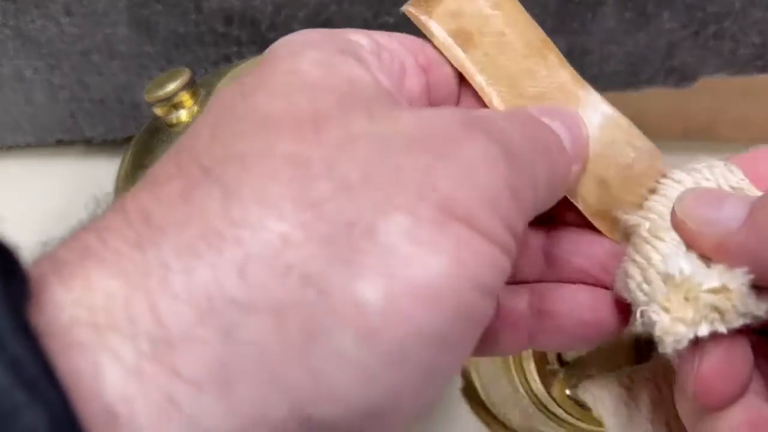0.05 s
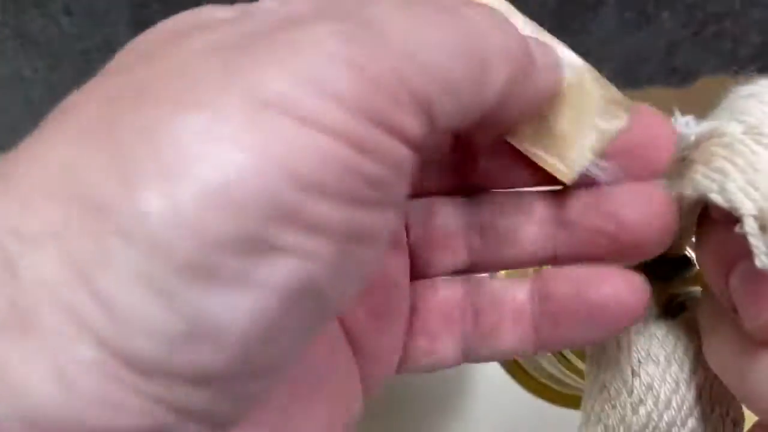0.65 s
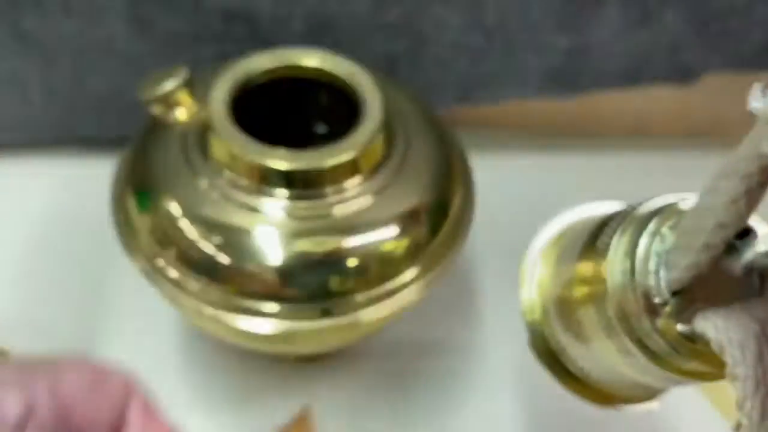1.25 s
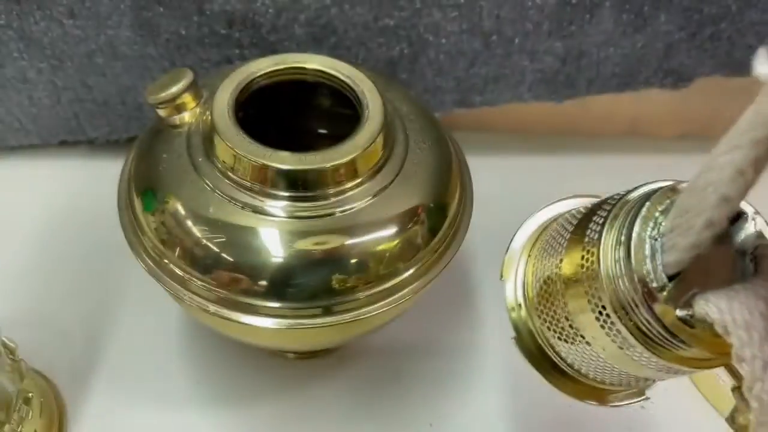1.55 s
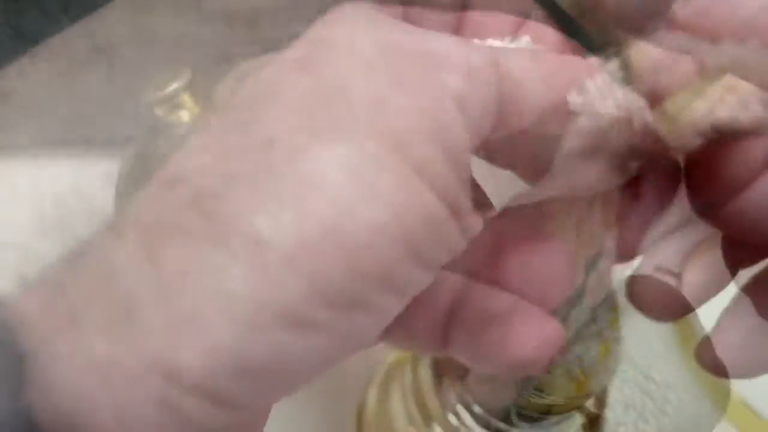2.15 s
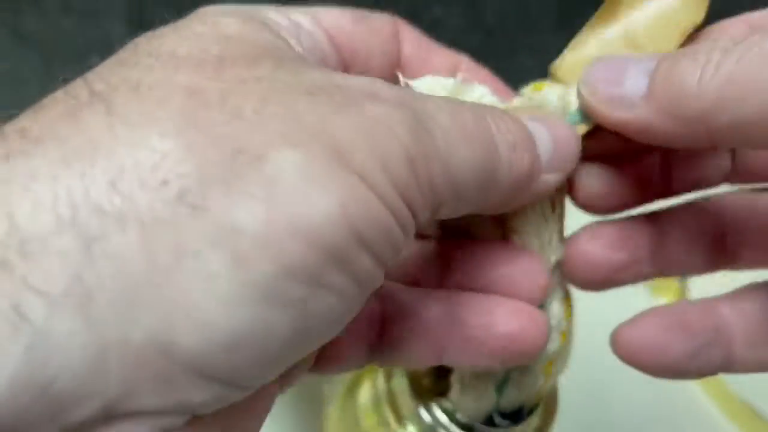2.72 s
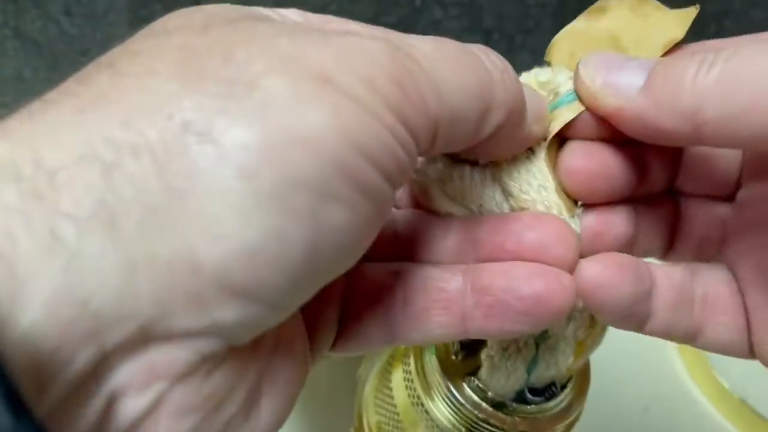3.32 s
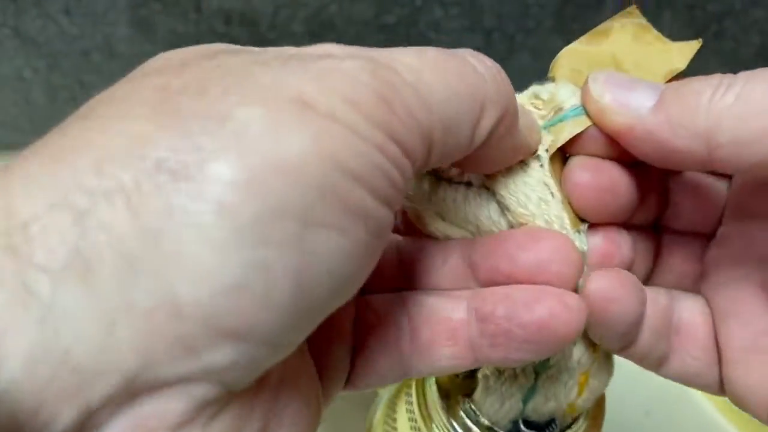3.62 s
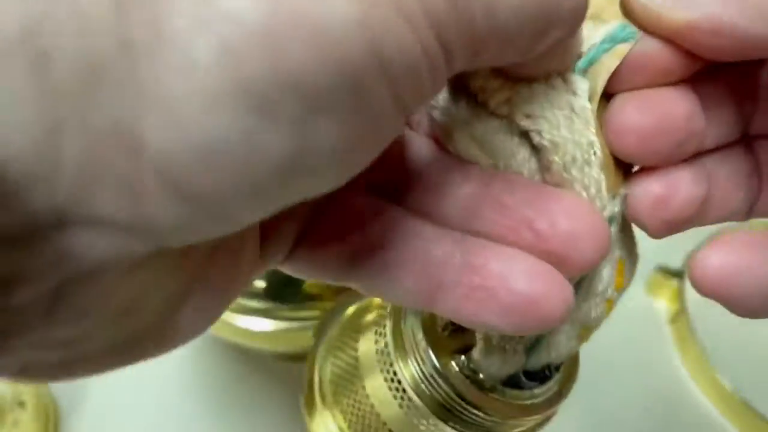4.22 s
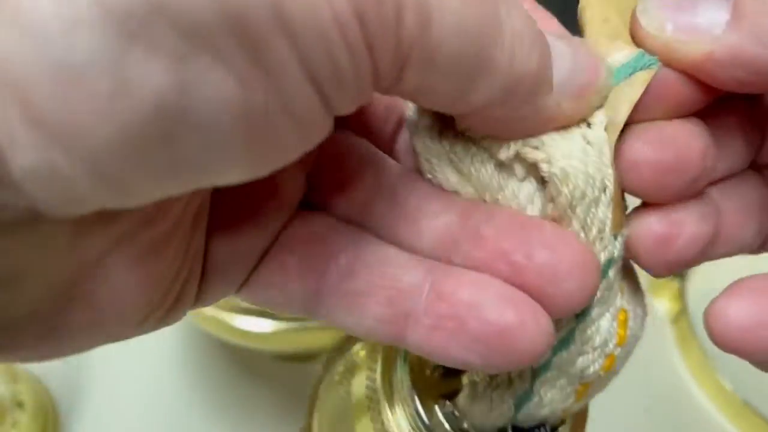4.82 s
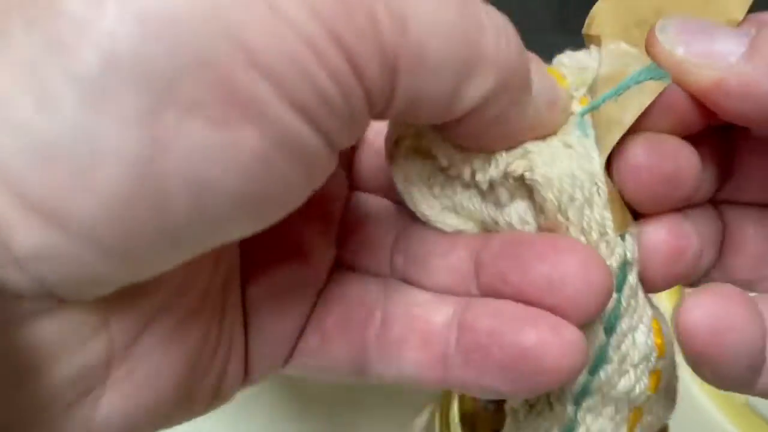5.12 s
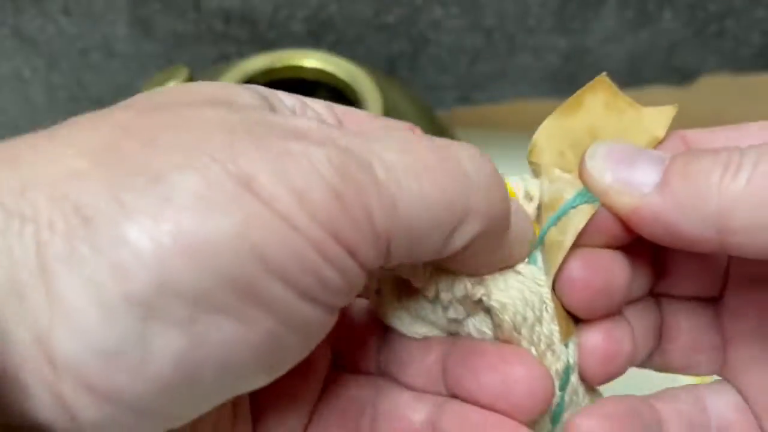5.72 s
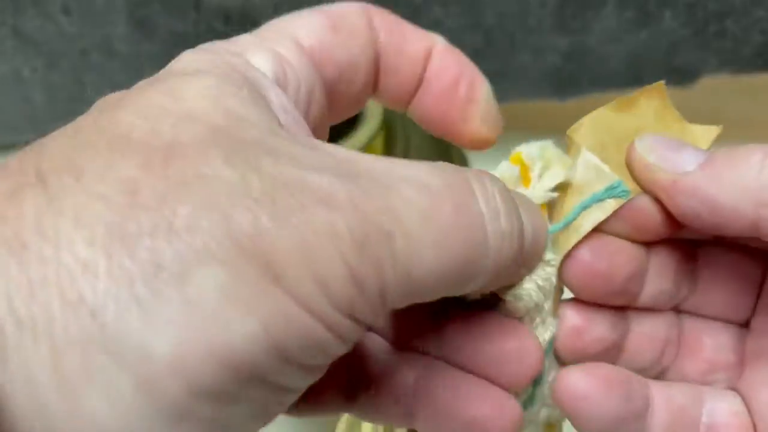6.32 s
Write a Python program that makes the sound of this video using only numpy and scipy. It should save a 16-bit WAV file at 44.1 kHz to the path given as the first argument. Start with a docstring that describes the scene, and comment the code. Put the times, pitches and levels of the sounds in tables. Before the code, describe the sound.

Close, quiet rustling and tiny snaps as fingers pull sticky paper from a cotton wick, with a single small metallic chatter.

```python
"""A quiet room, close up: two hands peel paper tape off a cotton lamp wick.
Glue and fibres let go in clumps of tiny slips and single snaps; fingers rub and bump the paper,
and the weave creaks. The hollow between the hands colours all of this. The brass burner hanging
on the wick chatters once as it swings. Underneath: arm rumble, sleeves, room air and faint hums."""
import sys
import numpy as np
from scipy import signal
from scipy.fft import rfft, irfft, next_fast_len
from scipy.io import wavfile
from scipy.ndimage import uniform_filter1d, map_coordinates

SR = 44100
rng = np.random.default_rng(int(sys.argv[2]) if len(sys.argv) > 2 else 0)


def generate_wav(sig):
    """Save sig (samples, or channels by samples) to the path in sys.argv[1] as 16-bit PCM at SR."""
    pcm = np.round(np.clip(np.atleast_2d(sig).T, -1, 1) * 32767).astype(np.int16)
    wavfile.write(sys.argv[1], SR, pcm)


N = 280557

# spectrum of parting glue and fibres: (frequency [Hz], density [dB])
FIBRE_SPECTRUM = [(4000, -42), (7000, -37), (8500, -4), (9700, 3), (11300, 7), (12300, -7), (13600, -21),
                  (15200, -21.5), (16200, -38.5)]
# spectrum of breaking threads: (frequency [Hz], density [dB])
THREAD_SPECTRUM = [(2500, -31.5), (4500, -1.5), (6200, 5), (7800, 9.5), (9500, 10.5), (13000, -48.5)]


def amp(db):
    """Decibels to gain."""
    return 10 ** (np.asarray(db) / 20)


def unit(x):
    """Scale to rms 1."""
    return x / np.sqrt(np.mean(x ** 2) + 1e-20)


def along(points, hz):
    """Interpolate (frequency [Hz], value) points on a log axis."""
    knots_hz, values = np.transpose(points)
    return np.interp(np.log(hz + 1), np.log(knots_hz), values)


def curves(rows):
    """One value per sample for each column after the time."""
    times_s, *columns = np.transpose(rows)
    return [np.interp(np.arange(N) / SR, times_s, column) for column in columns]


def wobble(knots_per_s):
    """Smooth random curve."""
    knots = rng.standard_normal(int(N * knots_per_s / SR) + 4)
    return map_coordinates(knots, [np.arange(N) * knots_per_s / SR])


def filtered(x, response):
    """Apply a complex frequency response."""
    size = next_fast_len(N + SR // 2)
    return irfft(rfft(x, size) * response(np.fft.rfftfreq(size, 1 / SR)), size)[..., :N]


def coloured(x, spectrum, size=4096):
    """Apply a minimum-phase filter of unit energy with this spectral shape."""
    magnitude = unit(amp(along(spectrum, np.fft.rfftfreq(size, 1 / SR))))
    cepstrum = irfft(np.log(magnitude))
    cepstrum[1:size // 2] *= 2
    cepstrum[size // 2:] = 0
    return signal.oaconvolve(x, irfft(np.exp(rfft(cepstrum))))[:N]


def add(track, start_s, sound):
    """Mix a sound into a track."""
    part = track[max(round(start_s * SR), 0):][:len(sound)]
    part += sound[:len(part)]


def room_air():
    """Steady stereo room noise: one common part, one per side."""
    # (frequency [Hz], density [dB])
    air_spectrum = [(20, -20), (40, -5), (62, -2), (110, -8), (300, -21), (800, -24.5), (3000, -28.5),
                    (7000, -41.5), (11000, -13), (13500, -55), (16000, -77)]
    air = np.array([coloured(rng.standard_normal(N), air_spectrum) for _ in range(3)])
    return amp(-79.0) * (air[0] + 1.53 * air[1:])


def hums():
    """Wavering mains hum; faint low hums come and go."""
    # (start [s], end [s], pitch [Hz], level [dB])
    passing_hums = [(-.1, .31, 253.4, -66), (5.517, 6.5, 57.6, -65.5), (6.115, 6.5, 162, -61)]
    mains_hz, ramp_s = 59.5, 0.0073
    t = np.arange(N) / SR
    hum = np.sin(2 * np.pi * mains_hz * t + 0.63 * wobble(11)) * amp(-75.0 + 2.1 * wobble(4.54))
    for start_s, end_s, hz, db in passing_hums:
        gate = np.clip(np.minimum(t - start_s, end_s - t) / ramp_s, 0, 1)
        hum += amp(db) * gate * np.sin(2 * np.pi * hz * t + 0.7 * wobble(19))
    return hum


def arms():
    """Moving forearms rumble; sleeves brush."""
    # (time [s], relative rumble level [dB], relative sleeve level [dB])
    movement = [(0.0, -65, -70), (0.32, -71, -92), (0.51, -80, -75), (1.1, -76, -100), (1.5, -78, -81.5),
                (1.75, -67.5, -82), (2.32, -76, -78), (2.99, -72, -67), (3.42, -78, -86),
                (3.74, -75, -79.5), (4.02, -64.5, -60.5), (4.22, -67, -90), (4.5, -77, -85),
                (5.01, -72, -68.5), (5.47, -82, -81.5), (5.77, -74, -101), (6.13, -61, -71),
                (6.36, -66.5, -67)]
    # both: (frequency [Hz], density [dB])
    rumble_spectrum = [(30, -29), (70, 9.5), (110, 4.5), (160, 5.5), (230, -6), (550, -16), (2000, -51)]
    sleeve_spectrum = [(120, -15.5), (240, -15.5), (330, 3.5), (420, -15), (600, -11.5), (2000, -56)]
    rumble_db, sleeve_db = curves(movement)
    rumble = amp(rumble_db + 0.5) * coloured(rng.standard_normal(N), rumble_spectrum)
    sleeve = amp(sleeve_db - 1.5) * coloured(rng.standard_normal(N), sleeve_spectrum)
    return rumble + sleeve


def reflections(x, near_db, near_t60_s, room_db, blocks=150):
    """Ever-changing early scatter off moving hands, lamp and table, plus a faint room tail."""
    # (frequency [Hz], t60 [s])
    room_decay = [(150, 0.42), (1500, 0.072), (10000, 0.016)]
    # (frequency [Hz], gain [dB])
    scatter_gain = [(200, -0.5), (1200, -3), (2500, 5), (7000, 5.5), (9000, 6), (16000, -45)]
    hz, t, bins = signal.stft(rng.standard_normal((2, SR // 3)), SR, nperseg=256)
    tail = signal.istft(bins * amp(-60 * t / along(room_decay, hz)[:, None]), SR, nperseg=256)[1]
    wet = amp(room_db) * signal.fftconvolve(x[None], tail / np.linalg.norm(tail[0]), axes=1)[:, :N]
    t = np.arange(SR // 50) / SR
    hop = N // blocks
    for start in range(0, N - hop, hop):
        piece = x[start:start + 2 * hop]
        piece = piece * np.sin(np.linspace(0, np.pi, len(piece)))
        for side in wet:
            near = rng.standard_normal(len(t)) * amp(-60 * t / near_t60_s) * (1 - np.exp(-t / 0.00047))
            add(side, start / SR, amp(near_db) * signal.fftconvolve(piece, near / np.linalg.norm(near)))
    return filtered(wet, lambda f: amp(along(scatter_gain, f)))


def palm_echo(x, tuning, closure):
    """One quick inverted reflection between the palms combs the upper mids."""
    delay_s, low_hz, high_hz = 0.001179 / tuning, 1400, 8500

    def comb(hz):
        band = (1 - np.exp(-(hz / low_hz) ** 4)) * np.exp(-(hz / high_hz) ** 4)
        return 1 - 0.36 * closure * band * np.exp(-2j * np.pi * hz * delay_s)
    return filtered(x, comb)


def cupped_hands(x):
    """The hollow between the hands rings; pitch and strength follow the grip."""
    # peaks and dips at tuning 1, closure 1: (frequency [Hz], width [Hz], gain [dB])
    resonances = [(530, 170, -4), (1250, 570, 3.5), (1620, 84, -2.5), (1940, 760, 0), (7330, 830, -3.5)]
    # (time [s], tuning [ratio], closure [0-1.5])
    grips = [(0.25, 1.03, 0.77), (1.3, 0.47, 0.2), (2.6, 1.15, 0.75), (3.4, 1, 0.23), (4.4, 1, 0.5),
             (5.172, 0.88, 0.53), (5.33, 0.997, 0.57), (5.95, 1.04, 1.3), (6.2, 1.01, 1.1)]
    times_s = [row[0] for row in grips]
    out = np.zeros(N)
    for share, (_, tuning, closure) in zip(np.eye(len(grips)), grips):
        part = x * np.interp(np.arange(N) / SR, times_s, share)  # crossfade between grips
        for hz, width_hz, db in resonances:
            angle = 2 * np.pi * hz * tuning / SR
            damping = np.pi * width_hz / SR
            gain = amp(closure * db / 2)
            section = lambda d: [1 + d, -2 * np.cos(angle), 1 - d]
            part = signal.lfilter(section(damping * gain), section(damping / gain), part)
        out += palm_echo(part, tuning, closure)
    return out


def burner():
    """Loose brass parts bounce: bright clicks trailing into fine rattle; later ones are mostly thinner."""
    # (time [s], relative peak [dB], low cutoff [Hz])
    contacts = [(1.687, -40, 2470), (1.736, -20.5, 2350), (1.7549, -41, 4000), (1.7587, -29, 3500),
                (1.7645, -40, 4500), (1.7778, -23.5, 6500), (1.7944, -30, 5500), (1.81, -31.5, 7000),
                (1.828, -40, 6500)]
    # (frequency [Hz], density [dB])
    brass_spectrum = [(4000, -2.5), (5600, 0), (8200, -5.5), (11300, 5), (13300, -31)]
    click_t60_s, rattle_db, rattle_t60_s = .006, -26, .036
    t = np.arange(SR // 25) / SR
    fade = amp(-60 * t / click_t60_s) + amp(rattle_db - 60 * t / rattle_t60_s)
    track = np.zeros(N)
    for time_s, db, low_hz in contacts:
        highpass = signal.butter(2, low_hz, "high", fs=SR, output="sos")
        click = signal.sosfilt(highpass, fade * rng.standard_normal(len(t)))
        add(track, time_s, amp(db) * click / np.abs(click).max())
    return coloured(track, brass_spectrum)


def creaks():
    """The tight weave slips under the thumb, one dull pulse per slip."""
    # (time [s], relative level [dB])
    weave_slips = [(4.227, -40), (4.282, -42), (4.289, -45), (4.3786, -37.5), (4.393, -34.5), (4.4095, -40),
                   (4.435, -47), (4.442, -42.5), (4.4861, -47), (5.949, -42), (6.0141, -37.5), (6.091, -37),
                   (6.107, -32.5), (6.117, -37), (6.139, -41), (6.16, -39)]
    # (frequency [Hz], density [dB])
    creak_spectrum = [(300, -10), (750, -16), (1150, 5.5), (1700, -15), (2250, 1), (3200, -31),
                      (5000, -16.5), (8000, -12.5)]
    pulses = np.zeros(N)
    for time_s, db in weave_slips:
        add(pulses, time_s, amp([db - 14.5]))
    return coloured(pulses, creak_spectrum) * np.sqrt(SR / 100)


def bumps():
    """Damped contacts of fingers, tape and wick: push and recoil, short ring, noisy shiver."""
    # (time [s], relative peak [dB], pitch [Hz], t60 [cycles])
    contacts = [(0.319, -39.5, 910, 15), (0.339, -34.5, 800, 10), (0.347, -40, 600, 6.6),
                (0.359, -37.5, 790, 21), (0.373, -42, 724, 48), (0.398, -43.5, 734, 35),
                (0.47, -42, 392, 12), (0.4705, -40.5, 970, 8.8), (0.954, -40.5, 607, 6.8),
                (0.958, -52.5, 118, 2.3), (0.963, -48.5, 425, 3), (1.615, -51, 346, 17),
                (1.693, -44, 396, 15), (1.736, -44, 386, 20), (1.888, -51, 1250, 12),
                (2.0958, -35, 1220, 4.6), (2.532, -54, 1490, 11), (2.9667, -42.5, 1100, 8.3),
                (2.968, -50, 297, 5.1), (3.15, -51, 345, 5.3), (4.913, -46.5, 864, 4.8),
                (5.151, -29.5, 717, 14), (5.152, -48.5, 141, 5), (5.2045, -29.5, 2670, 71),
                (5.514, -39, 1260, 4.5), (5.7898, -30, 957, 5.6)]
    width_octaves, shiver_t60_s = .55, 0.034
    t = np.arange(SR // 10) / SR
    hz = np.fft.rfftfreq(len(t), 1 / SR)
    shiver = 0.05 * amp(-60 * t / shiver_t60_s)
    track = np.zeros(N)
    for time_s, db, pitch_hz, t60_cycles in contacts:
        cycles = t * pitch_hz
        fade = amp(-60 * cycles / t60_cycles)
        band = np.exp(-.5 * (np.log2((hz + 1) / pitch_hz) / width_octaves) ** 2)
        noise = unit(irfft(band * rfft(rng.standard_normal(len(t))), len(t)))
        ring = fade * np.sin(2 * np.pi * cycles) + noise * (.9 * fade + shiver)
        push = 0.28 * cycles * (1 - cycles) * np.exp(-2 * cycles)
        hit = ring * (1 - np.exp(-2 * cycles)) ** 2 + push
        add(track, time_s, amp(db) * hit / np.abs(hit).max())
    return track


def snaps():
    """A thread or crease gives at once; the loosened paper shivers and flutters out."""
    # (time [s], relative crack level [dB], relative paper flap level [dB])
    breaks = [(0.0091, -29, -60), (0.015, -21.5, -57), (0.046, -38, -72), (0.122, -34, -51),
              (0.133, -31, -49), (0.19, -23, -38), (0.247, -22.5, -55), (0.273, -44, -45),
              (0.327, -30, -44), (0.3467, -23.5, -54), (0.47, -42, -57), (0.954, -40, -60),
              (1.0414, -41, -48), (1.0437, -36, -48), (1.1606, -42, -49), (1.1677, -44, -57),
              (2.3176, -33.5, -38.5), (2.355, -41.5, -57), (2.392, -50, -48.5), (2.5304, -35.5, -44.5),
              (2.549, -43, -57), (2.565, -45, -49), (2.58, -40, -56), (2.9928, -45, -53.5),
              (3.036, -47, -63), (3.053, -41, -54), (3.0599, -54, -46), (3.1214, -30.5, -43.5),
              (3.339, -42.5, -64), (3.407, -43, -60), (3.429, -41, -59), (3.538, -38.5, -49.5),
              (3.599, -35, -68), (3.671, -36, -79), (4.0193, -46, -46.5), (4.4862, -38, -50.5),
              (4.5138, -35, -60), (4.541, -33.5, -61), (4.913, -46, -48.5), (5.1225, -37, -75),
              (5.1355, -40, -67), (5.2039, -34, -28.5), (5.2933, -45, -45.5), (5.3195, -46, -45),
              (5.3305, -36, -38), (5.3341, -44, -35), (5.3422, -42, -38.5), (5.35, -39, -43),
              (5.391, -43.5, -48.5), (5.836, -47, -52), (5.8576, -46, -48.5), (5.865, -49, -51),
              (5.874, -47, -48.5), (5.894, -45, -52), (5.9052, -45, -41), (5.924, -39, -50),
              (5.948, -36, -39), (5.963, -43, -44), (5.971, -40, -45), (5.995, -41, -55),
              (6.0147, -37, -37.5), (6.109, -33, -44.5), (6.3293, -43, -41)]
    # (frequency [Hz], density [dB])
    flap_spectrum = [(200, -39), (700, -9), (1400, -0.5), (2300, 1.5), (3200, -5), (4600, 0), (6200, 6),
                     (9500, 8.5), (11000, -2), (14000, -32)]
    shiver_t60_s, flutter_t60_s = .006, .028
    t = np.arange(SR // 25) / SR
    tail = .19 * amp(-60 * t / shiver_t60_s) + .025 * amp(-60 * t / flutter_t60_s)
    cracks, flaps = np.zeros((2, N))
    for time_s, crack_db, flap_db in breaks:
        crack, flap = (t == 0) + tail * rng.standard_normal((2, len(t)))
        add(cracks, time_s, amp(crack_db - 12.0) * unit(crack))
        add(flaps, time_s, amp(flap_db - 10.0) * unit(flap))
    bright = coloured(cracks, FIBRE_SPECTRUM) + amp(-21) * coloured(cracks, THREAD_SPECTRUM)
    return bright + coloured(flaps, flap_spectrum)


def stray_fibres(rate_per_s):
    """Single fibres let go at random, one tick each."""
    releases = rng.random(N) < rate_per_s / SR
    return unit(coloured(releases.astype(float), FIBRE_SPECTRUM))


def gesture_db(t, start_s, hold_s, rise_db_per_s, fall_db_per_s):
    """Level of one movement: builds up to its start, holds, dies away."""
    rise_db = rise_db_per_s * np.minimum(t - start_s, 0)
    fall_db = fall_db_per_s * np.maximum(t - start_s - hold_s, 0)
    return np.maximum(rise_db - fall_db, -120)


def effort_db():
    """Relative levels of glue, threads, paper and cotton: resting grip plus pulls and tugs."""
    # fingers only holding on: (glue [dB], threads [dB], paper [dB], cotton [dB])
    resting_db = [-76, -77, -84, -109]
    # steady pulls: (start [s], length [s], glue [dB], threads [dB], paper [dB], cotton [dB])
    pulls = [(0, 0.22, -34.5, -41.5, -51, -68), (0.179, 0.03, -36.5, -57, -52.5, -54.5),
             (0.22, 0.12, -38, -49.5, -53.5, -58), (0.314, 0.05, -41.5, -46.5, -50.5, -52.5),
             (0.361, 0.077, -45.5, -50, -62, -59.5), (0.475, 0.021, -34, -45, -52.5, -53.5),
             (0.718, 0.072, -44, -54.5, -62.5, -63.5), (0.877, 0.2, -63.5, -69, -71, -81),
             (0.989, 0.045, -52, -54.5, -57, -64.5), (1.214, 0.078, -48.5, -50.5, -60, -69.5),
             (1.334, 0.028, -50.5, -57, -65, -68.5), (1.407, 0.038, -51, -65.5, -79, -103),
             (1.696, 0.26, -65, -71.5, -72, -68), (1.994, 0.024, -57, -54, -67, -65),
             (2.073, 0.061, -56, -58, -62, -59), (2.192, 0.05, -61, -64, -65, -66.5),
             (2.471, 0.19, -48.5, -53.5, -52, -61.5), (2.708, 0.041, -40.5, -46.5, -52, -63),
             (2.754, 0.045, -51, -59, -55, -56.5), (2.834, 0.52, -61, -66, -69.5, -67.5),
             (3.153, 0.15, -51, -61, -61.5, -71), (3.336, 0.25, -54.5, -68.5, -70.5, -84),
             (3.611, 0.042, -47.5, -63, -66, -70), (3.784, 0.21, -62.5, -64, -65.5, -68.5),
             (3.921, 0.027, -54, -60, -60.5, -60), (4.02, 0.29, -54, -61.5, -65.5, -63.5),
             (4.17, 0.062, -52.5, -61.5, -62.5, -55.5), (4.354, 0.14, -51, -58, -66.5, -68),
             (4.651, 0.18, -61.5, -62, -63, -64), (4.847, .26, -52.5, -58.5, -69.5, -68),
             (5.17, 0.02, -43, -39.5, -52.5, -72), (5.263, 0.15, -67, -61.5, -74, -77),
             (5.492, 0.55, -63.5, -62.5, -70.5, -75), (5.666, 0.014, -56, -54, -59.5, -68.5),
             (5.737, 0.11, -60.5, -57.5, -65.5, -71), (5.92, 0.07, -49.5, -49, -55.5, -59),
             (6.077, 0.067, -46.5, -47, -53, -53.5), (6.164, 0.053, -55, -54, -62.5, -60.5),
             (6.246, 0.16, -61, -59.5, -64.5, -62.5)]
    # tugs freeing a patch at once: (time [s], glue [dB], threads [dB], paper [dB], cotton [dB])
    tugs = [(0.133, -43, -50, -53, -62), (0.681, -40.5, -48.5, -57.5, -61), (1.598, -51, -64, -68.5, -68),
            (2.12, -40.5, -43, -46, -59), (2.329, -55, -47.5, -58, -78), (2.36, -57, -53, -60.5, -75),
            (2.384, -57, -70, -53, -56), (2.422, -66, -57.5, -53, -60.5), (2.526, -39.5, -59, -43, -45),
            (2.899, -69, -66, -58.5, -58.5), (4.386, -39.5, -44.5, -55.5, -49),
            (4.522, -43.5, -46.5, -61, -69), (4.877, -45.5, -65, -72, -69), (5.149, -26, -29.5, -41, -43),
            (5.208, -44, -45, -54.5, -57.5), (5.334, -41.5, -39, -53, -57.5), (6.102, -45, -41.5, -59, -55)]
    sag_db_per_s = 5
    t = np.linspace(0, N / SR, 6000)
    power = amp(resting_db)[:, None] ** 2
    for start_s, length_s, *levels_db in pulls:
        shape_db = gesture_db(t, start_s, length_s, rise_db_per_s=488, fall_db_per_s=416)
        shape_db -= sag_db_per_s * np.clip(t - start_s, 0, length_s)
        power = power + amp(np.add.outer(levels_db, shape_db)) ** 2
    for start_s, *levels_db in tugs:
        shape_db = gesture_db(t, start_s, hold_s=0.0062, rise_db_per_s=1571, fall_db_per_s=501)
        power = power + amp(np.add.outer(levels_db, shape_db)) ** 2
    unsteady_db = 1.3 * wobble(22)  # hand force is never even
    return curves(np.column_stack([t, *(10 * np.log10(power))])) + unsteady_db


def stick_slip(rate_per_s, life_s):
    """Slip activity jumps at random moments and decays."""
    jumps = rng.random(N) < rate_per_s / SR
    activity = signal.lfilter([1], [1, -np.exp(-1 / (life_s * SR))], jumps)
    return unit(activity - activity.mean())


def slips(rate_per_s, spread_db, smooth, clump_db):
    """Tiny uneven slips, in clumps, over a share of smooth friction."""
    at = np.flatnonzero(rng.random(N) < rate_per_s / SR)
    friction = smooth * rng.standard_normal(N)
    size_db = spread_db * np.clip(rng.standard_normal(N)[at], -2, 2)
    grains = np.zeros(N)
    grains[at] = amp(size_db) * (-1) ** at / np.sqrt(rate_per_s[at])
    return unit((unit(grains) + friction) * amp(clump_db))


def contact_drift(x, depth_db=1.5):
    """The rubbing's colour drifts as the contact point moves."""
    bins = signal.stft(x, nperseg=512)[2]
    field = uniform_filter1d(rng.standard_normal(bins.shape), size=8, axis=0)
    field = uniform_filter1d(field, size=12, axis=1)
    return unit(signal.istft(bins * amp(depth_db * unit(field)), nperseg=512)[1][:N])


def peeling():
    """Glue parts, threads break, paper slides, skin rubs cotton; all catch and slip together."""
    # both: (frequency [Hz], density [dB])
    paper_spectrum = [(700, -55.5), (1400, -4.5), (2200, 3), (3200, 3), (4600, 2.5), (6500, -17.5),
                      (10000, -58)]
    cotton_spectrum = [(120, -13.5), (350, -1.5), (520, -7), (760, 2), (950, -3), (1250, -1), (1800, -6.5),
                       (3000, -35.5)]
    glue_db, thread_db, paper_db, cotton_db = effort_db()
    catch = .85 * stick_slip(480, life_s=.0016) + .35 * stick_slip(130, life_s=.007)
    catch = np.minimum(catch, 2)  # the grip gives before a catch grows large
    catch *= np.clip(.55 + .035 * (glue_db - paper_db), .6, 1.1)  # glue jerks, sliding paper is smooth
    rate_per_s = 2800 * amp(.45 * (glue_db + 40.0))  # a harder pull parts more fibres
    glue = coloured(slips(rate_per_s, spread_db=4.5, smooth=.85, clump_db=2.6 * catch), FIBRE_SPECTRUM)
    threads = coloured(slips(rate_per_s, spread_db=4, smooth=.8, clump_db=2.4 * catch), THREAD_SPECTRUM)
    paper = coloured(slips(rate_per_s, spread_db=3, smooth=.6, clump_db=2.7 * catch), paper_spectrum)
    cotton = coloured(slips(rate_per_s / 2, spread_db=1, smooth=1, clump_db=2.7 * catch), cotton_spectrum)
    return (amp(glue_db + 0.56) * (contact_drift(glue) + amp(-13) * stray_fibres(rate_per_s=24))
            + amp(thread_db - 0.5) * contact_drift(threads)
            + amp(paper_db - 1.8) * paper
            + amp(cotton_db - 0.53) * contact_drift(cotton))


def scene():
    """Close handwork and burner, their reflections, and the background."""
    handwork = amp(-0.2) * bumps() + peeling() + snaps() + creaks()
    direct = cupped_hands(handwork) + burner()
    reflected = reflections(direct, near_db=-11.0, near_t60_s=0.0071, room_db=-14.5)
    return amp(-1.0) * direct + reflected + arms() + room_air() + hums()


def record(dry):
    """Two microphone ports resonate out of step, the left brighter in the upper mids; band limit."""
    # (frequency [Hz], left phase lead [rad])
    left_lead = [(1800, 0), (3000, 1.1), (5300, 1), (6500, .3), (7700, 1.2), (8400, 0), (10200, -3.14),
                 (12000, -6.2), (13700, -9.4), (15200, -12.5)]
    # (frequency [Hz], left over right [dB])
    left_boost = [(1000, 0.5), (4400, 3.0), (7300, 3.0), (9500, 0.0)]
    top_hz = 16200
    sides = np.array([[.5], [-.5]])
    ports = lambda hz: np.exp(1j * sides * along(left_lead, hz)) * amp(sides * along(left_boost, hz))
    return filtered(dry, lambda hz: ports(hz) * (hz < top_hz))


dry = scene()
out = record(dry)
generate_wav(out)
```